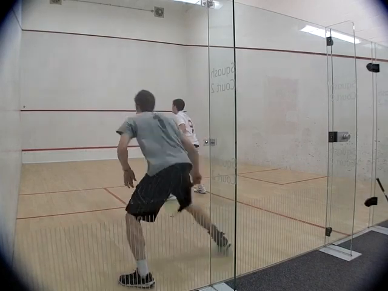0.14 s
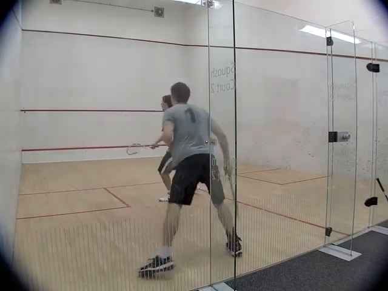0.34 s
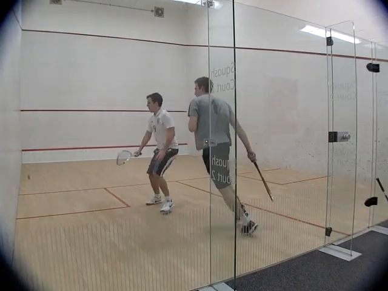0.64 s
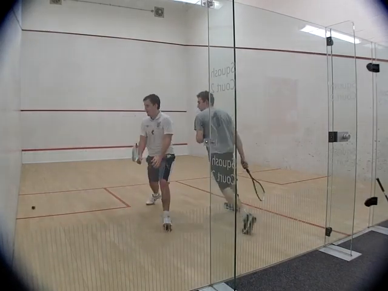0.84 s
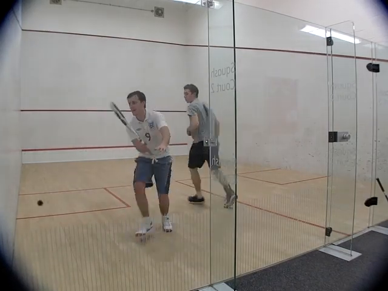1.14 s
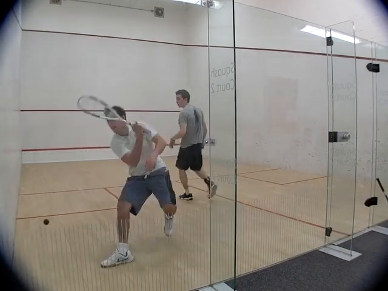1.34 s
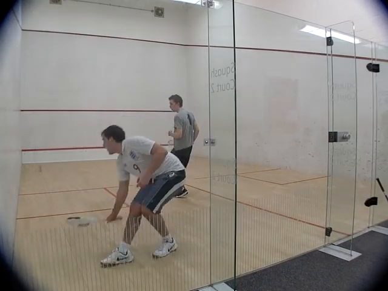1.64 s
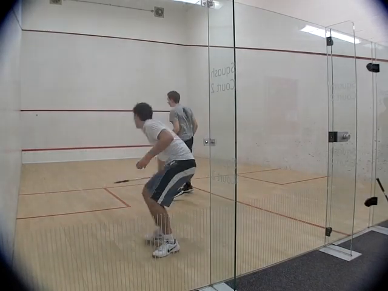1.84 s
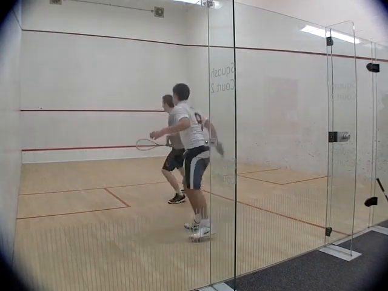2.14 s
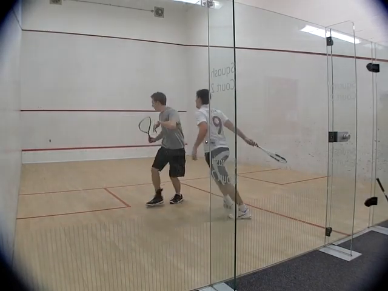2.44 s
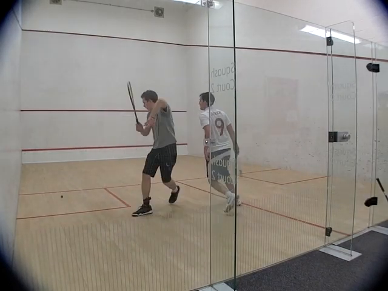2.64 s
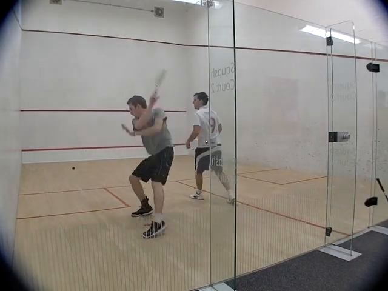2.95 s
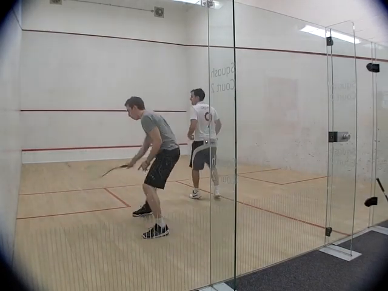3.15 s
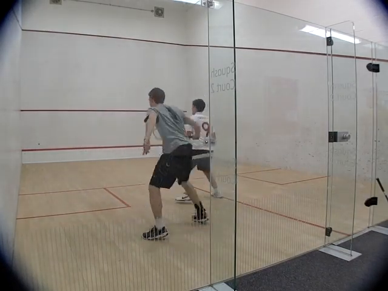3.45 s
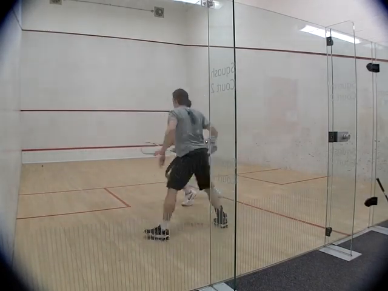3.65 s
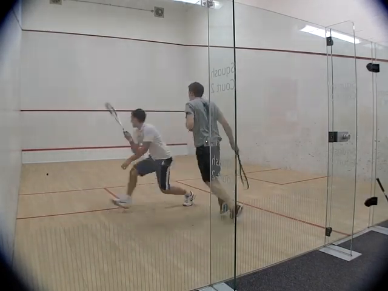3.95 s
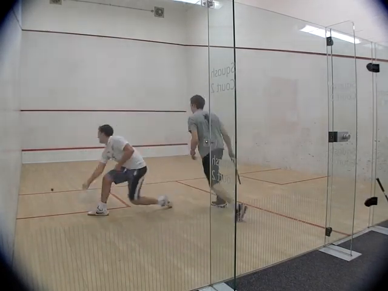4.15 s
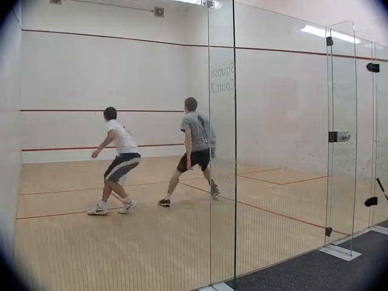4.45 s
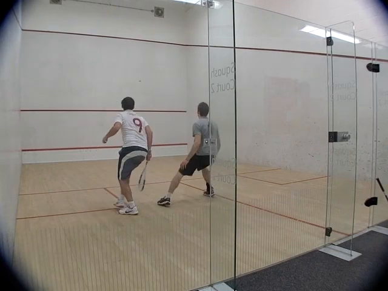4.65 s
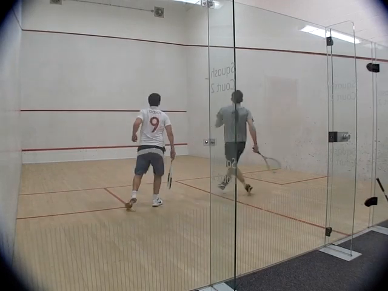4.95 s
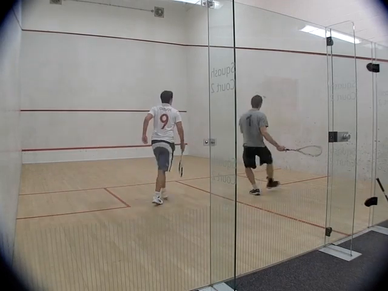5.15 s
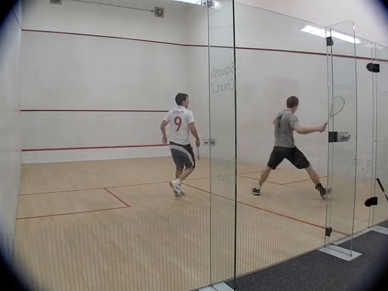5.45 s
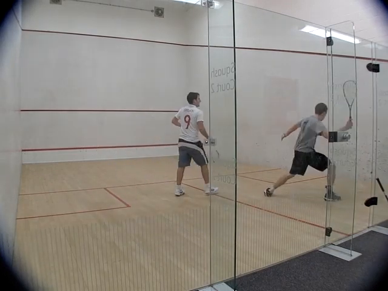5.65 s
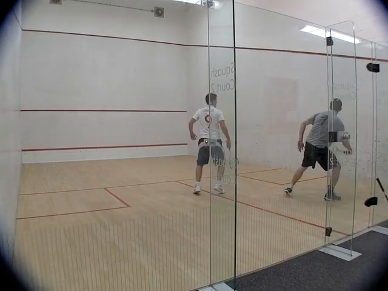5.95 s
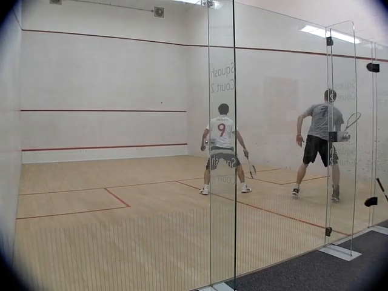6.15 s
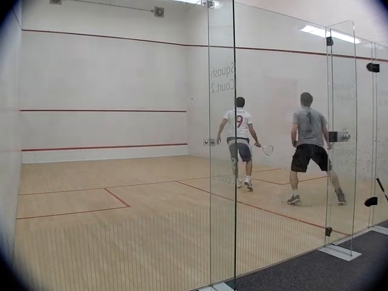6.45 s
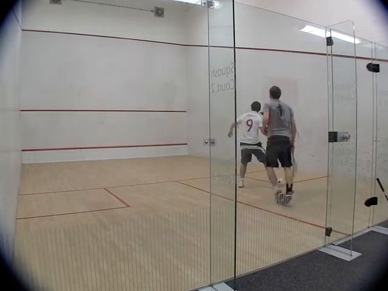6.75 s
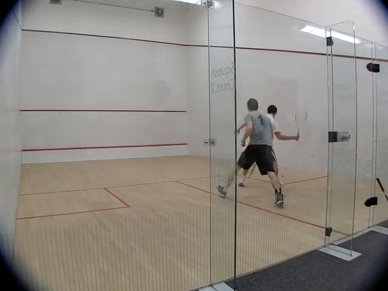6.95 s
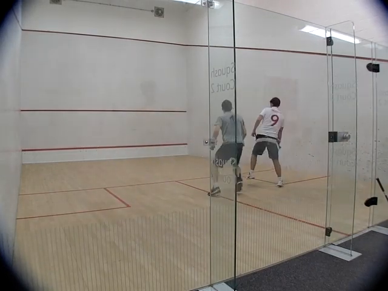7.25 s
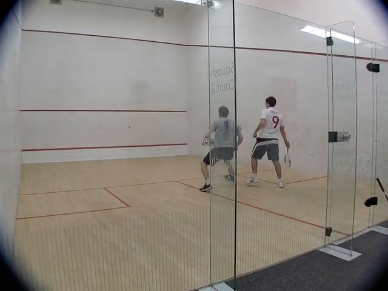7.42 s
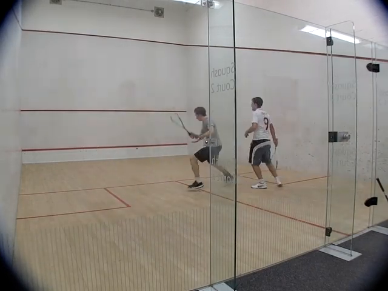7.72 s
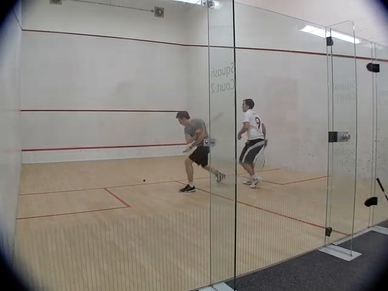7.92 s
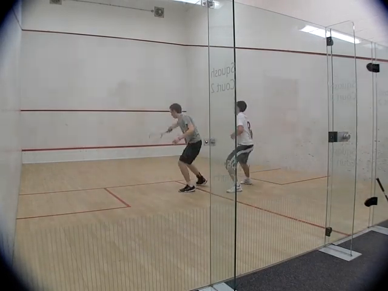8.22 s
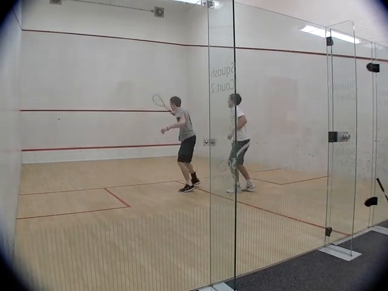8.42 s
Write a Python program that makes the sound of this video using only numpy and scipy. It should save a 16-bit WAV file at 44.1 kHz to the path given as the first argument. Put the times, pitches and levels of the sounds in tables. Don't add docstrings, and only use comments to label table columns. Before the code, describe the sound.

A squash ball cracks off rackets and walls in a bright echoing court, with sharp shoe squeaks and dull foot thuds over ventilation hum.

```python
import sys
import numpy as np
from scipy import signal
from scipy.fft import rfft, irfft, next_fast_len
from scipy.io import wavfile
from scipy.ndimage import uniform_filter1d

SR = 44100
rng = np.random.default_rng(int(sys.argv[2]) if len(sys.argv) > 2 else 0)


def wrap_up_sound(samples):
    columns = np.atleast_2d(samples).T
    tamed = np.clip(columns, -1, 1)
    steps = np.round(tamed * 32767).astype(np.int16)
    wavfile.write(sys.argv[1], SR, steps)


def magnitude_from_level(level_db):
    exponent = np.asarray(level_db, float) / 20
    return 10 ** exponent


N = 378378
SPOTS = 5


def at_hz(points, hz):
    points = np.array(sorted(points))
    return np.interp(np.log(np.maximum(hz, 1)), np.log(points[:, 0]), points[:, 1])


def add(track, s, sound):
    start = max(round(s * SR), 0)
    track[..., start:start + sound.shape[-1]] += sound[..., :N - start]


def unit(sound):
    return sound / np.linalg.norm(sound)


def causal_pulse(db):
    cepstrum = irfft(np.log(magnitude_from_level(db)))
    half = len(cepstrum) // 2
    cepstrum[1:half] *= 2
    cepstrum[half + 1:] = 0
    return irfft(np.exp(rfft(cepstrum)))


def coloured(x, db_table):
    hz = np.fft.rfftfreq(x.shape[-1], 1 / SR)
    return irfft(rfft(x) * magnitude_from_level(at_hz(db_table, hz)), x.shape[-1])


# pitch_hz, level_db (per Hz)
AIR = [(15, -32), (25, -10), (59, -1), (114, -5.5), (229, -10.5), (373, -10), (607, -15), (1230, -14.5),
       (1940, -21.5), (2760, -27), (3080, -28), (6560, -53.5), (16000, -50)]


def ventilation():
    noise = coloured(rng.standard_normal((2, N)), AIR)
    return magnitude_from_level(-34.5) * noise / noise.std()


def early_field(count):
    t60_s, rise_s = 0.059, 0.005
    t = np.arange(SR // 8) / SR
    fade = magnitude_from_level(-60 * t / t60_s) * np.minimum(t / rise_s, 1)
    scatter = rng.standard_normal((count, 2, len(t))) * fade
    return scatter / np.linalg.norm(scatter, axis=2, keepdims=True)


# start_s, strength_db, hollow_ring_db, hardness_db, contact_notch_hz
BLOWS = [(0.011, -12, -1.5, 1, 1170), (0.063, -28, 14, 11, 1280), (0.189, -25, -8, -2, 1330),
         (1.626, -25.5, -1, 4, 1040), (1.947, -16, -3.5, 2, 1210), (3.174, -18.5, 2.5, 4.5, 1430),
         (3.225, -14.5, -8, -3.5, 1230), (3.363, -6, -2, 2.5, 1540), (4.271, -11, -11.5, -12, 1200),
         (4.339, -17.5, -6.5, -8, 1360), (4.512, -21.5, 0, 5.5, 1290), (5.903, -25, 1.5, 3, 1270),
         (5.956, -34, -4, 4, 1300), (6.219, -16.5, 2, 2, 957), (7.114, -23.5, 0, 4.5, 1020),
         (7.161, -32.5, 10.5, 7, 1030), (7.339, -16, 1.5, 3.5, 1024), (8.105, -20, -3, 0, 1100),
         (8.317, -13.5, 2.5, 2, 1020), (8.486, -58, -19, 1, 1260)]
FRONT_WALL_ROWS = [1, 3, 4, 6, 7, 11, 12, 14, 15, 17]
# pitch_hz, level_db (per Hz)
BALL = [(60, -22.5), (150, 0.5), (370, 5.5), (570, -2.5), (800, 5.5), (1100, -5), (2200, -15),
        (3300, -24.5), (4300, -19), (5300, -9.5), (8000, -0.5), (10000, -13), (12500, 0), (16000, -23)]
# low_hz, high_hz
BLOW_BANDS = [(500, 1200), (150, 500), (1200, 2600), (5200, 14000), (3000, 4200)]
# level_db (over strength), swell (extra dB per dB), ring_share, hardness_share
BAND_LAW = [(3, 0.2, 0.87, .01), (0.5, -0.32, .01, 0.011), (-1, 0.3863, 0.011, 0.14),
            (-22.5, .01, .01, 0.72), (-14, -0.12, .01, 1.23)]


def blows(spots, direct):
    usual_blow_db, front_wall_db = -18, -8.5
    flattens_from_db, notch_db_per_db = -20.5, 1.72
    hz = np.fft.rfftfreq(4096, 1 / SR)
    base = at_hz(BALL, hz)
    band_power = [np.sum(magnitude_from_level(2 * base[(hz > lo) & (hz < hi)])) / len(hz) for lo, hi in BLOW_BANDS]
    band_db = 10 * np.log10(band_power)
    centres = [np.sqrt(lo * hi) for lo, hi in BLOW_BANDS]
    early = early_field(len(BLOWS))
    usual_db, swell, ring_share, hard_share = np.transpose(BAND_LAW)
    for k, (s, db, ring_db, hard_db, notch_hz) in enumerate(BLOWS):
        levels = db + usual_db + swell * (db - usual_blow_db)
        levels = levels + ring_share * ring_db + hard_share * hard_db
        bend = at_hz(list(zip(centres, levels - band_db - 4)), hz)
        depth_db = notch_db_per_db * max(db + ring_db - flattens_from_db, 0)
        notch = depth_db * np.exp(-((hz - notch_hz) / 170) ** 2)
        pulse = causal_pulse(base + bend - notch)
        add(spots[k % SPOTS], s, pulse)
        early_db = 17.5 - 0.7 * db + front_wall_db * (k in FRONT_WALL_ROWS)
        add(direct, s, magnitude_from_level(early_db) * signal.fftconvolve(early[k], pulse[None], axes=1))


# pitch_hz, t60_s
COURT_T60 = [(30, 2.02), (100, 1.12), (250, 2), (500, 2.87), (1100, 2.345), (3000, 2.55), (5000, 1.98),
             (8000, 1.2), (15000, 0.7)]


def court_echoes():
    build_up_s, dense_after_s = 0.013, 0.03
    clumps_db, clumps_hz, clumps_last_s = 3.5, 42, 0.071
    t = np.arange(int(2.5 * SR)) / SR
    density = np.clip((t / dense_after_s) ** 2, .01, 1)
    arrivals = rng.random((SPOTS, 1, len(t))) < density
    echoes = rng.standard_normal((SPOTS, 2, len(t))) * arrivals / np.sqrt(density)
    echoes = echoes * (1 - np.exp(-t / build_up_s))
    clumps = signal.lfilter(*signal.butter(2, clumps_hz, fs=SR), rng.standard_normal((SPOTS, 1, len(t))))
    echoes = echoes * magnitude_from_level(clumps_db * clumps / clumps.std() * np.exp(-t / clumps_last_s))
    hz, at, cells = signal.stft(echoes, SR, nperseg=1024)
    decay = magnitude_from_level(-60 * at / at_hz(COURT_T60, hz)[:, None])
    return signal.istft(cells * decay, SR, nperseg=1024)[1][..., :len(t)]


# start_s, length_s, pitch_hz, level_db, wander_hz
SQUEAKS = [(0.10, 0.089, 3583, -28.5, 48), (1.572, 0.097, 3507, -22.5, 209.5),
           (3.305, 0.1303, 3694, -14, -130), (4.12, 0.034, 3560, -25, 53), (4.145, 0.0276, 3900, -29.5, 91),
           (4.16, 0.092, 4005, -29.5, 100), (4.478, 0.033, 3257, -21.5, 246), (6.28, 0.049, 3678, -33, 60),
           (6.52, 0.03, 3360, -38, 47), (7.44, 0.17, 3337, -18.5, 220.5), (7.97, 0.19, 4510, -38, 40),
           (8.02, 0.045, 4540, -37, 100), (8.44, 0.08, 5420, -33.5, 60)]
# multiple, level_db
OVERTONES = [(2, -19.5), (3, -38.5)]


def squeaks(spots, direct):
    glide_per_width, grip = 1.387, 0.16
    direct_db = 21.5
    wander = signal.lfilter(*signal.butter(4, 170, fs=SR), rng.standard_normal((len(SQUEAKS), SR // 2)))
    for k, (s, length, hz, db, width) in enumerate(SQUEAKS):
        along = np.linspace(0, 1, int(length * SR))
        unsteady = np.clip(wander[k, :len(along)] / wander.std(), -2, 2)
        pitch = hz + width * (glide_per_width * (along - .5) + unsteady)
        phase = 2 * np.pi * np.cumsum(pitch) / SR
        tone = np.sin(phase) + sum(magnitude_from_level(over_db) * np.sin(n * phase) for n, over_db in OVERTONES)
        tone = unit(tone * np.sqrt(np.sin(np.pi * along ** grip)))
        add(spots[(k + 2) % SPOTS], s, magnitude_from_level(db) * tone)
        add(direct, s, magnitude_from_level(db + direct_db) * tone)


# start_s, level_db, push_hz, board_swing_db
STEPS = [(0.625, -7.5, 63, -29), (0.72, -21, 52.3, 1), (1.287, -13, 56.5, -4.5), (1.399, -16, 69, -7),
         (2.381, -16.5, 48.2, -35), (2.97, -13, 71, -21), (3.71, -19, 68.6, -3), (4.067, -6.5, 64, -18),
         (4.198, -19, 31.8, -1), (4.35, -14, 81, -8), (4.906, -40, 37, 0), (5.1, -24, 45.7, -10),
         (5.551, -36, 43.6, 6), (6.063, -24, 74.5, -23), (6.166, -21.5, 69.5, -5),
         (6.858, -26.5, 69.5, -12), (7.098, -37.5, 79.6, 9), (7.498, -20, 44.5, -3.5),
         (7.748, -25, 59.7, -5), (8.314, -29.5, 79.5, -10)]
# pitch_hz, level_db, t60_s
BOARDS = [(37.7, -1.5, 0.61), (56.5, -26.5, 0.33), (75.2, -2.5, 1), (130, -6.5, 1), (158.8, -9, 0.97)]


def steps(spots, direct):
    t = np.arange(SR // 2) / SR
    rise = 1 - np.exp(-t / 0.0037)
    strengths = rng.normal(0, 3.7, (len(STEPS), len(BOARDS)))
    for k, (s, db, hz, swing_db) in enumerate(STEPS):
        push = np.sin(2 * np.pi * hz * t) * np.exp(-t * hz / 0.56) * rise
        swing = np.zeros(len(t))
        for (mode_hz, mode_db, t60), own_db in zip(BOARDS, strengths[k]):
            swing += magnitude_from_level(mode_db + own_db - 60 * t / t60) * np.sin(2 * np.pi * mode_hz * t)
        add(spots[k % SPOTS], s, magnitude_from_level(db - 6.5) * unit(push))
        add(direct, s, magnitude_from_level(db) * push + magnitude_from_level(db + swing_db) * swing * rise)


# start_s, level_db, t60_s, brightness_hz
GLASS = [
    (1.283, -9.5, 0.11, 2120),
]


def glass(direct):
    t = np.arange(SR // 2) / SR
    for s, db, t60, hz in GLASS:
        rattle = rng.standard_normal(len(t)) * magnitude_from_level(db - 60 * t / t60)
        add(direct, s, signal.sosfilt(signal.butter(2, hz, fs=SR, output="sos"), rattle))


# pitch_hz, level_db
PORT = [(4000, -2), (7800, -29), (9000, -3), (10000, 9.5), (11300, 0.5), (13000, -12)]
# pitch_hz, side_minus_mid_db
WIDTH = [(60, -25), (160, -17.5), (270, -13.5), (450, -8.5), (740, -4.5), (1220, 2.5), (2010, 7.5),
         (3330, 10), (5500, 10), (8000, 12), (10000, 11), (12000, 8.5), (15000, 7)]
# pitch_hz, left_minus_right_db
TILT = [(200, 0), (800, 0.65), (2000, -2.5), (3500, 0), (6000, -1), (8000, 3.5), (10000, -4.5), (11500, 1)]


def scene():
    spots, direct = np.zeros((SPOTS, N)), np.zeros((2, N))
    blows(spots, direct)
    squeaks(spots, direct)
    steps(spots, direct)
    glass(direct)
    size = next_fast_len(N + 3 * SR)
    echoed = rfft(spots, size)[:, None] * rfft(court_echoes(), size)
    wet = irfft(np.sum(echoed, axis=0), size)[:, :N]
    mid, side = coloured(wet + direct, PORT) + ventilation()
    side = coloured(side, WIDTH)
    left = coloured(mid + side, [(hz, db / 2) for hz, db in TILT])
    right = coloured(mid - side, [(hz, -db / 2) for hz, db in TILT])
    return np.array([left, right])


def low_pass(x):
    return signal.sosfilt(signal.butter(12, 16210, fs=SR, output="sos"), x)


# pitch_hz, width_hz
CAMERA_NOTCHES = [(2850, 520), (2850, 130), (4985, 190), (4985, 70)]


def record(dry):
    limit_db, squeeze, recover_db_s, attack_s = -12, 0.81, 13.5, 0.003
    give_back, give_back_s, give_back_from_db = 0.12, 0.1, -20.5
    converter_hiss_db = -22.5
    whine_hz, whine_db = 15734, -74
    level = 10 * np.log10(uniform_filter1d(np.mean(dry ** 2, axis=0), size=441) + 1e-10)
    slope = recover_db_s * np.arange(N) / SR
    held = np.maximum.accumulate(level + slope) - slope
    pole = np.exp(-1 / (attack_s * SR))
    cut_db = signal.lfilter([1 - pole], [1, -pole], squeeze * np.maximum(held - limit_db, 0))
    slow = np.exp(-1 / (give_back_s * SR))
    hunting_db = give_back * signal.lfilter([1 - slow], [1, -slow], level - give_back_from_db)
    x = np.tanh(dry * magnitude_from_level(hunting_db - cut_db))
    steepness = np.sqrt(uniform_filter1d(np.gradient(x, axis=1) ** 2, size=256))
    x = x + magnitude_from_level(converter_hiss_db) * steepness * rng.standard_normal(x.shape)
    for hz, width_hz in CAMERA_NOTCHES:
        x = signal.lfilter(*signal.iirnotch(hz, hz / width_hz, SR), x)
    x = signal.sosfilt(signal.ellip(12, .5, 60, 15800, fs=SR, output="sos"), x)
    whine = magnitude_from_level(whine_db) * np.sqrt(2) * np.sin(2 * np.pi * whine_hz * np.arange(N) / SR)
    x = x + whine * np.array([[1.5], [.5]])
    return low_pass(x)


dry = scene()
out = record(dry)
wrap_up_sound(out)
```